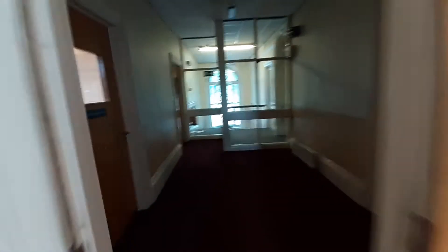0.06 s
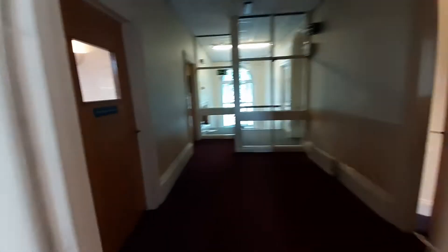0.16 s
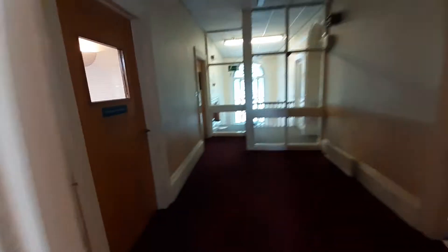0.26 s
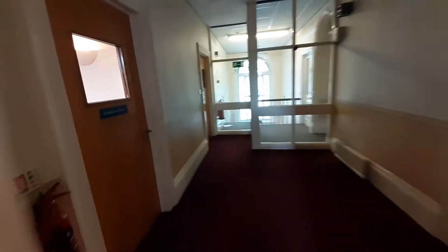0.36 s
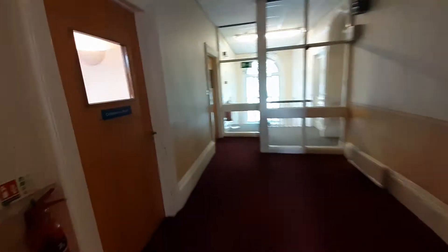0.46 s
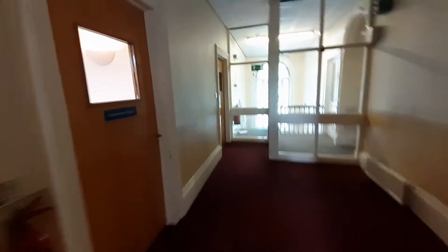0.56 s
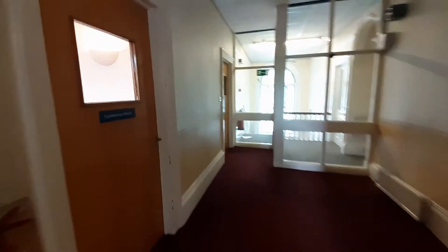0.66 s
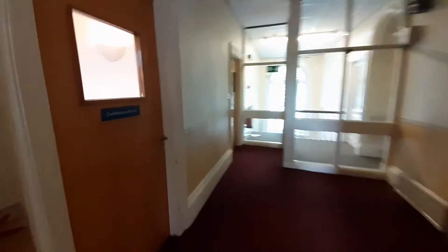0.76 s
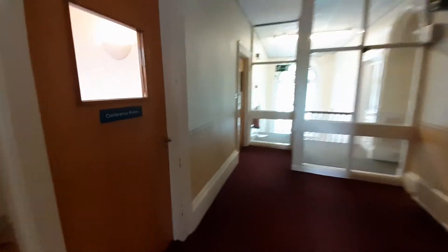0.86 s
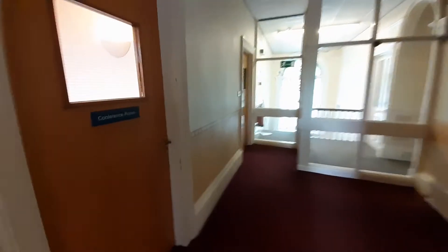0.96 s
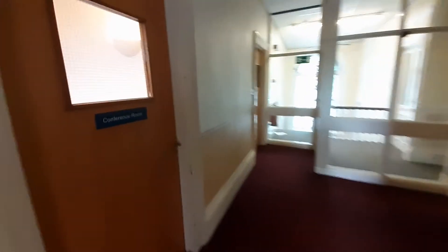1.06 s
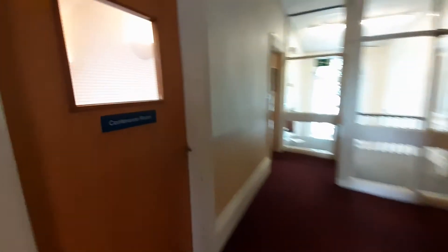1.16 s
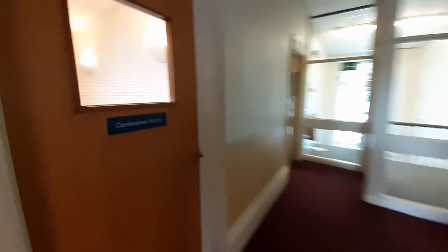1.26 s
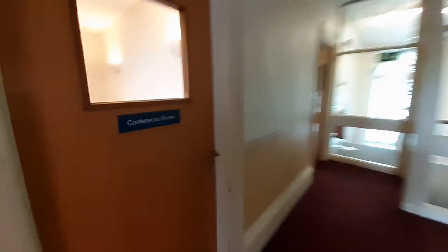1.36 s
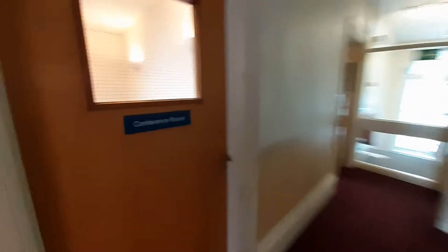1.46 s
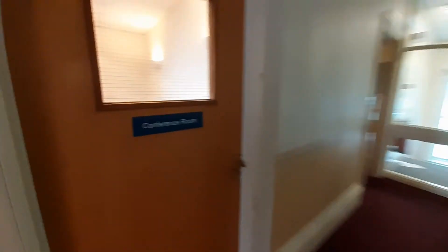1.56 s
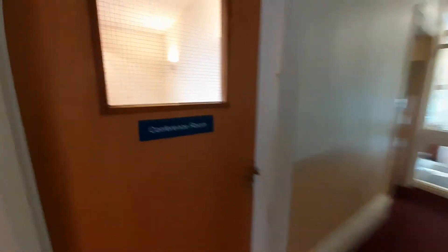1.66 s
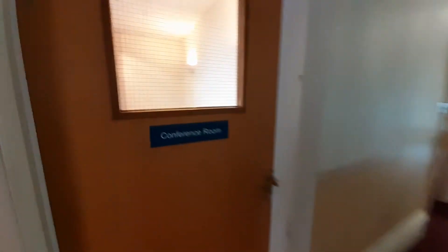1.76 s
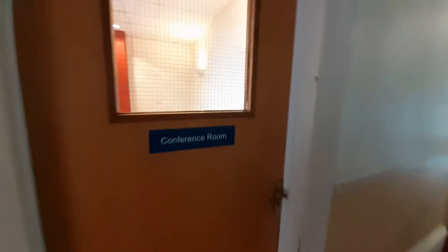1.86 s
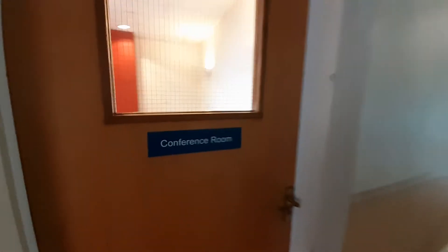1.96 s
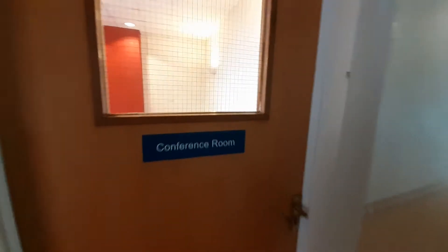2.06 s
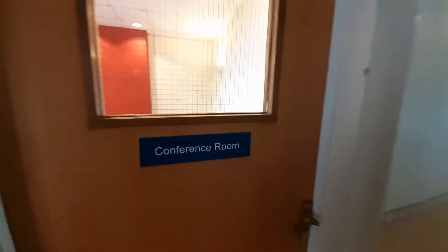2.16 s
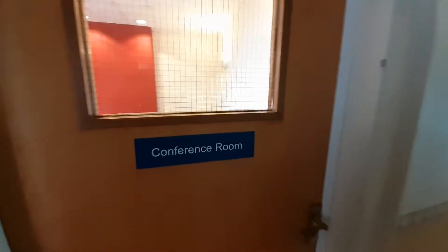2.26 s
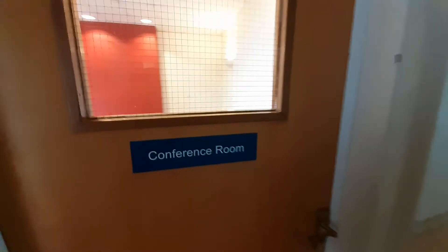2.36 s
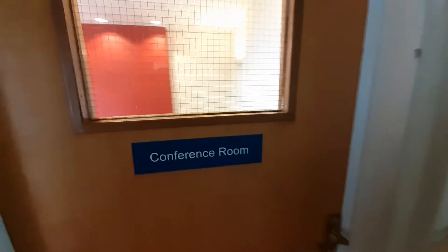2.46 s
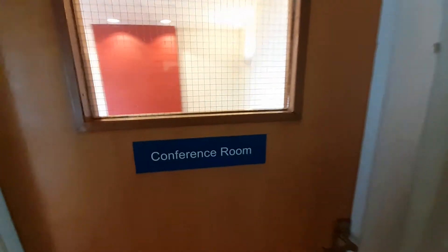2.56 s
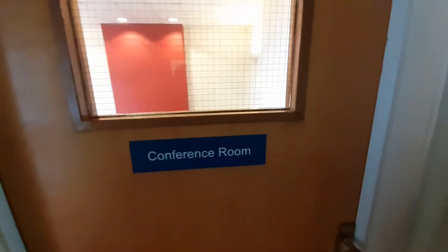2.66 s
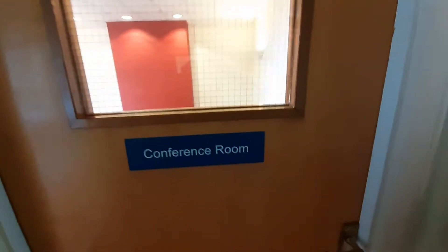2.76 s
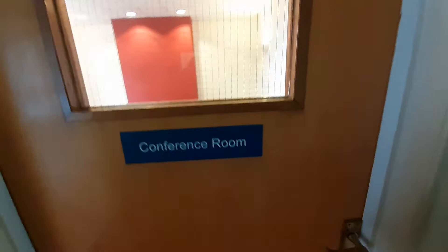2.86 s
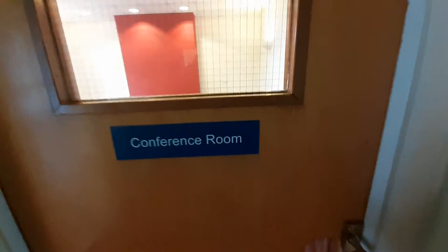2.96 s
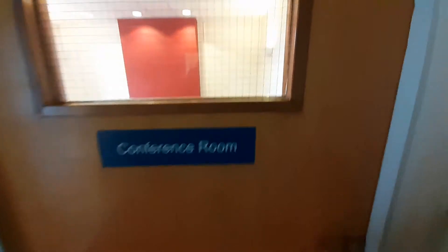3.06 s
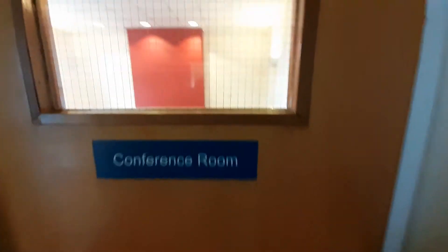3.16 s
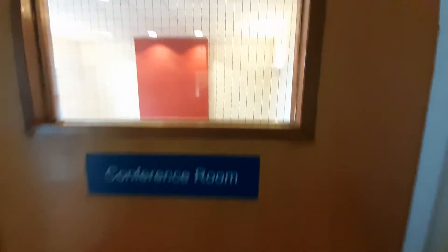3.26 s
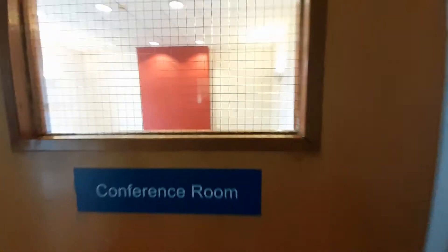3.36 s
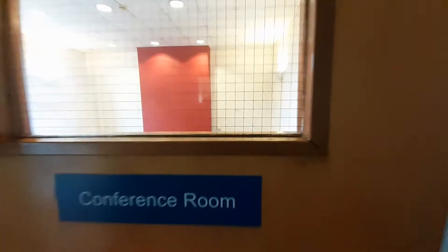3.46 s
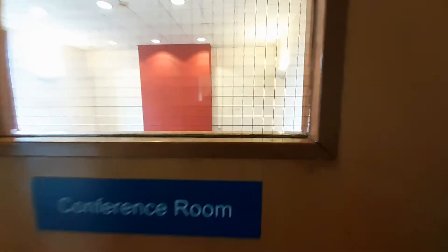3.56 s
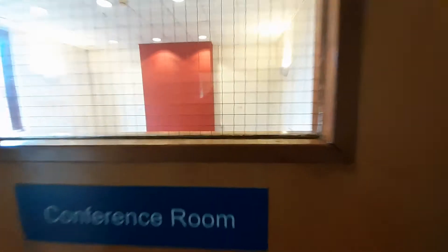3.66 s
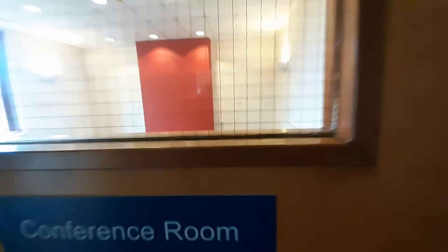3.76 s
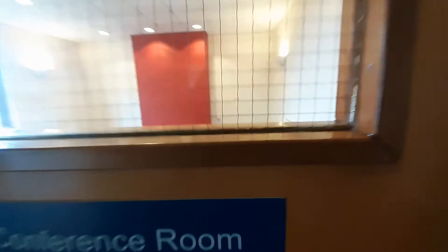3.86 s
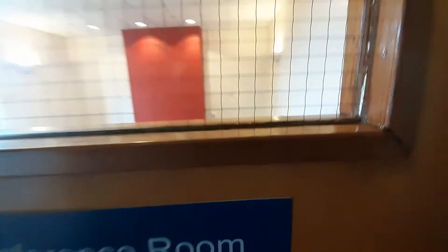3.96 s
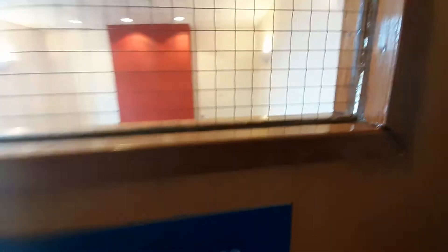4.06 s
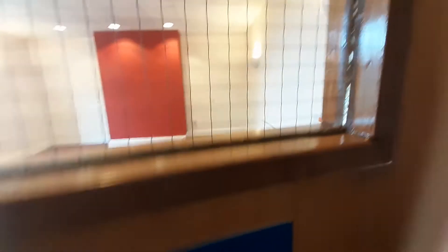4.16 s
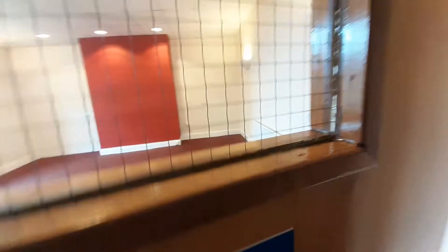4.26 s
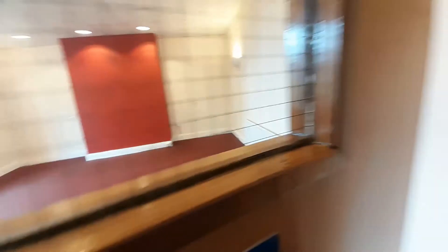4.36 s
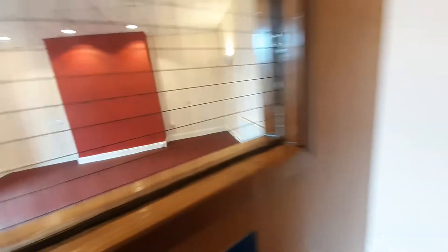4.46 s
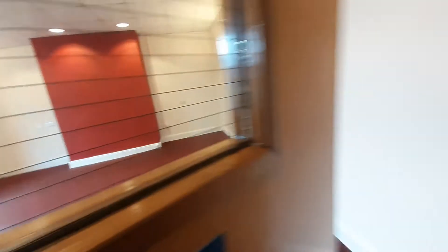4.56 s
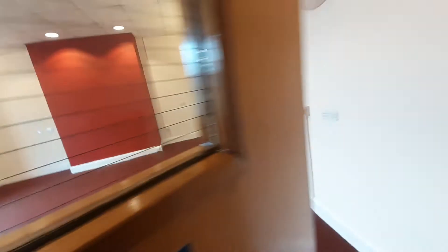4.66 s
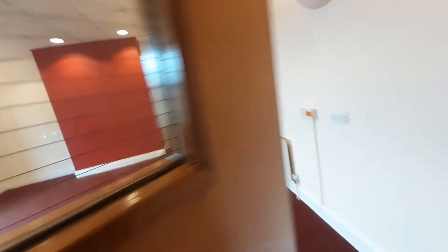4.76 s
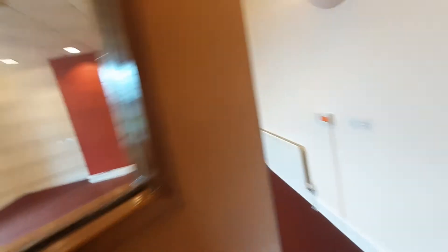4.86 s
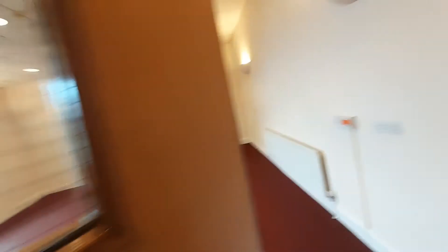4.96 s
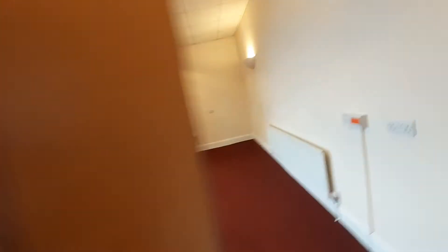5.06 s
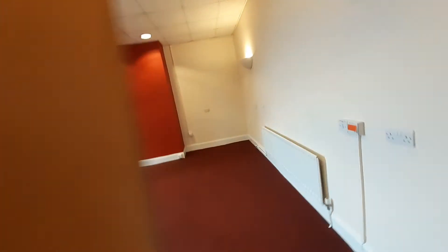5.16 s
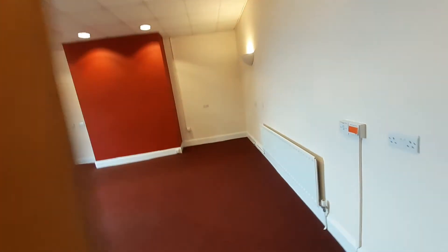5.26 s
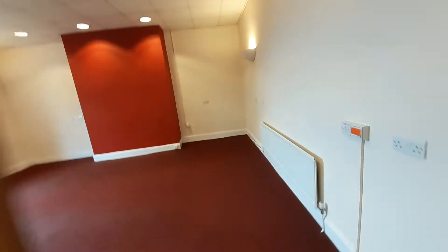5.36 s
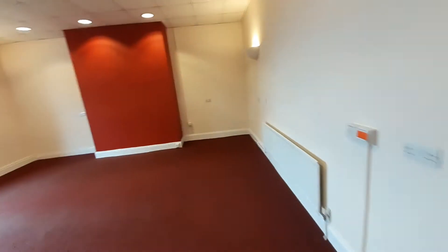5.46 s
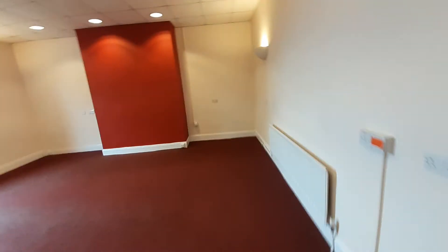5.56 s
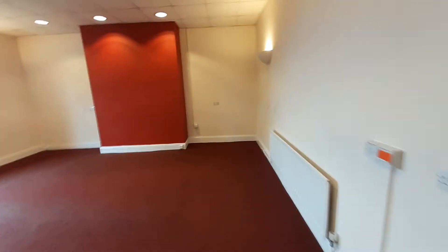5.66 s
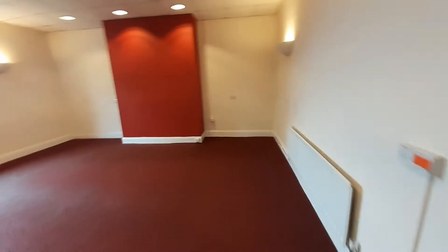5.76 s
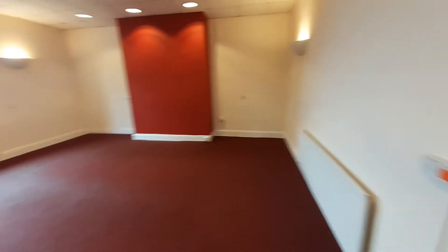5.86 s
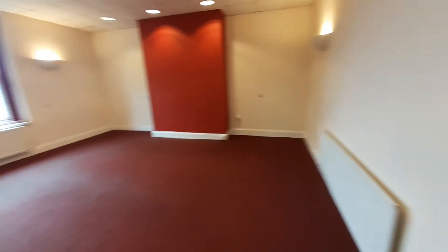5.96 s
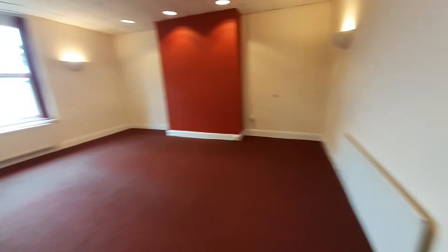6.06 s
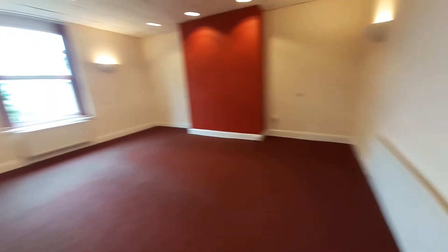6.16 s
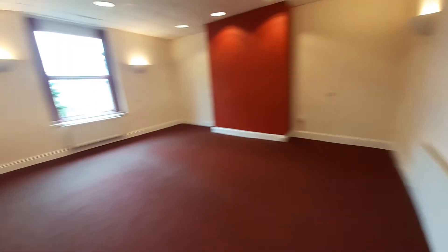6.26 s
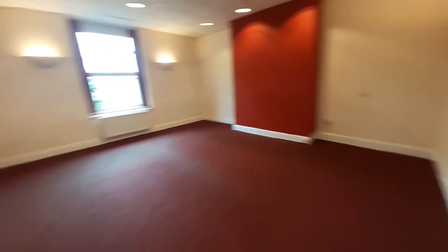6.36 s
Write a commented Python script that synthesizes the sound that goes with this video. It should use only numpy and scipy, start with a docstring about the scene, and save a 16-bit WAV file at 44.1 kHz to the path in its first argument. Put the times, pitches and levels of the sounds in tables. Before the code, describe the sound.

Dull footsteps on carpet and rustling clothing are heard close up on a handheld phone, over the faint hush of an empty building. Midway comes the loudest sound, a cluster of metal handle and latch clicks with the hollow knocks of a wooden door opening. Air rumbles briefly on the microphone in the doorway, followed by an echoing wooden clack and faint steps.

```python
"""Heels thump on carpet in a quiet, bare corridor, as someone walks along with a phone in hand.
Clothes swish with every move, soles brush the carpet, and a zip and buttons tick.
The walker presses a lever handle: the latch clicks and scrapes, and the wooden door booms as it opens.
In the doorway, air buffets the phone's two microphone openings, or "ports".
Wood clacks once near the start, and again in the empty room beyond the door."""
import sys
import numpy as np
from scipy import signal
from scipy.fft import rfft, irfft
from scipy.io import wavfile

SR = 44100
rng = np.random.default_rng(int(sys.argv[2]) if len(sys.argv) > 2 else 0)


def wav_record(signal):
    """Record a signal, one row per channel, as 16-bit PCM in the file named by sys.argv[1]."""
    frames = np.transpose(np.atleast_2d(signal))
    bounded = np.clip(frames, -1, 1)
    # unit amplitude maps onto the largest positive 16-bit level
    quanta = np.round(bounded * 32767).astype(np.int16)
    wavfile.write(sys.argv[1], SR, quanta)


N = 282618
TIME = np.arange(N) / SR
AGE = TIME[:SR]  # one second of ringing

# A "tone" lists how strong each pitch is. A "tilt" above 0 brightens it; one below 0 dulls it.
# echo of the bare walls: f/Hz, time to fade by 60 dB/s
WALL_FADES = [(70, 0.87), (250, 0.76), (1000, 0.39), (3000, 0.47), (12000, 0.23)]
# tone of the building's hush: f/Hz, level/dB
HUSH_TONE = [(18, -49), (30, -25), (145, -14), (540, -32), (600, -24.5), (760, -10), (1810, -16),
             (1960, -5), (2120, -20), (9220, -17), (16000, -15)]
# heels landing on carpet over boards: t/s, level/dB, tilt/(dB per octave), echo/dB
HEEL_HITS = [(0.0224, -23.5, -2, 5), (.062, -26, -5, -13), (0.632, -31.5, -9.5, 7), (1.173, -50.5, -2, 8),
             (1.379, -50, -8, 4), (1.85, -59, 4, 8), (1.9, -53.5, -7, 2.5), (2.478, -45, -22, 0.5),
             (3.233, -48, 7, -14), (6.19, -59.5, -1.5, 13), (6.373, -51, 5, 14)]
# tone of a heel: f/Hz, level/dB
HEEL_TONE = [(35, -26), (70, -5.5), (150, 1.5), (250, -2), (350, -5), (520, -12), (800, -12), (1600, -16),
             (3000, -29.5), (12000, -63)]
# pitches at which the floorboards ring: f/Hz, width/Hz, level/dB
BOARD_RINGS = [(188, 28, -10.5), (270, 15, 6.5), (321, 90, 8)]
# swings of an arm or leg: t/s at the fastest, level/dB, length/s, tilt/(dB per octave)
CLOTH_STROKES = [(.13, -49.5, 0.059, -6), (.37, -46, 0.19, 2), (0.704, -43, .15, 1.5),
                 (0.829, -47.5, 0.11, 1), (1.19, -56.5, 0.036, -2.5), (1.36, -59.5, 0.16, -4),
                 (1.94, -58, .12, -1.5), (2.31, -57, 0.15, -2), (2.7, -41.5, 0.21, 4), (3, -43.5, 0.23, 1),
                 (3.66, -47.5, .24, -4.5), (3.92, -56, 0.22, -3.5), (4.3, -45.5, 0.095, 0),
                 (4.46, -47.5, 0.15, -0.5), (5, -47, 0.19, -1.5), (5.24, -51.5, 0.13, -1.5),
                 (5.58, -59.5, 0.3, -4.5), (5.92, -61.5, 0.11, -8.5), (6.21, -63.5, 0.053, -7.5),
                 (6.4, -61.5, 0.12, -6)]
# tone of cloth rubbing on cloth: f/Hz, level/dB
CLOTH_TONE = [(35, -1), (70, 0), (280, 2), (470, 1), (1200, -1.5), (1900, -2), (3600, -1.5), (5300, -4.5),
              (7700, -3.5), (9100, -12), (12000, -6), (16000, -10)]
# wooden clacks: t/s, level/dB, tilt/(dB per octave), left delay/ms
CLACK_HITS = [(.1828, -32, 0, 0), (5.8485, -31.5, -1.5, -0.61), (5.852, -29.5, 0, -0.41),
              (5.875, -35, 2, -0.27), (5.944, -35, -2.5, -0.4)]
# tone of a hit on wood: f/Hz, level/dB
CLACK_TONE = [(80, -2), (250, -5.5), (480, 8), (800, 4.5), (1300, -3.5), (2200, -9), (4000, -18),
              (8000, -21.5), (15000, -35)]
# pitches at which the clacking wood rings: f/Hz, width/Hz, level/dB
WOOD_RINGS = [(235, 12, 14), (444, 83, -5.5), (1140, 420, 5.5), (1460, 200, -1)]
# ribbed cloth sliding past itself: t/s, level/dB, length/s, f/Hz at which the ribs cross
RIB_SLIDES = [(0.201, -59.5, 0.19, 4700), (.42, -53, 0.15, 4230), (0.613, -50.5, 0.14, 3320),
              (0.843, -44.5, 0.038, 2716), (4.43, -48, 0.14, 2103), (5.015, -54.5, 0.3, 2300)]
# soles brushing the carpet: t/s, level/dB, length/s
SOLE_DRAGS = [(0.266, -45, 0.11), (0.405, -46, 0.14), (0.798, -46.5, 0.23), (1.555, -55.5, 0.039),
              (2.143, -59.5, 0.069), (2.315, -56, 0.016), (2.704, -46.5, 0.26), (5.712, -54.5, 0.14),
              (5.857, -50, 0.017), (6.213, -52, 0.043)]
# tone of a brushing sole: f/Hz, level/dB
SOLE_TONE = [(60, -49), (300, -5), (600, 3), (850, 4.5), (1300, 2.5), (1800, -6), (4000, -7.5),
             (16000, -62)]
# zip and buttons ticking: t/s, level/dB, tilt/(dB per octave), left delay/ms
ZIP_HITS = [(.787, -51, -1, 0), (.895, -44.5, 2.5, 0), (1.175, -53, 18, 0), (1.665, -63, 8, 0),
            (5.245, -45.5, 1, -.2), (5.335, -47.5, 0.5, -.2), (5.4705, -47, 5.5, -.2),
            (6.3635, -46.5, 3, -.3)]
# tone of small metal parts: f/Hz, level/dB
METAL_TONE = [(70, -34), (200, -27), (600, -8), (1300, -2), (1650, -3), (1950, 4.5), (2400, 0.5),
              (2900, -2.5), (4200, 0), (5500, -6.5), (7800, -3.5), (9500, -15.5), (12000, -10),
              (16000, -16)]
# clicks of the handle and latch: t/s, level/dB, tilt/(dB per octave), left delay/ms
LATCH_HITS = [(3.2555, -38.5, -6.5, 0.11), (3.2585, -57, -6, 0), (3.326, -38, -6.5, -0.73),
              (3.348, -35, -7.5, 0.49), (3.356, -34.5, -6, -0.03), (3.3672, -32.5, 2, 0.17),
              (3.373, -32, 1, 0.21), (3.5115, -26.5, -1, 0.16), (3.5195, -32.5, -2.5, 0.83),
              (3.539, -38, -5, -0.44), (3.56, -31, -2.5, 0.61), (3.5665, -25, 5, -0.2),
              (3.577, -32, -4.5, 0), (3.5995, -29, -4.5, 0.025), (3.6265, -24.5, -10, 0.031),
              (3.638, -26, -7, 0), (3.6435, -15, -6, 1), (3.6458, -24.5, -11.5, -0.34),
              (3.7567, -22.5, -0.5, 0.22), (3.8387, -26.5, 9, -0.12), (3.8535, -28.5, 3, 0.35),
              (3.8735, -26, 7.5, 0.3), (3.8862, -28.5, 3.5, 0.47), (3.9137, -34.5, 2, 0.65),
              (3.932, -37, -10, 0.21)]
# the handle turning and the latch sliding: t/s at the start, length/s, level/dB
HANDLE_RUBS = [(3.349, 0.022, -41), (3.498, 0.13, -41.5), (3.78, 0.085, -38), (3.859, 0.083, -33.5)]
# blows on the door: t/s, level/dB, f/Hz above which the blow is muffled
DOOR_HITS = [(3.354, -31, 1190), (3.3649, -26, 1480), (3.3723, -19.5, 915), (3.425, -30, 700),
             (3.388, -33.5, 110), (3.502, -37, 700), (3.567, -25.5, 1320), (3.579, -26.5, 600),
             (3.5982, -28.5, 1300), (3.6276, -29, 2020), (3.643, -28, 2480), (3.651, -17.5, 440),
             (3.662, -15.5, 134), (3.756, -33, 1290), (3.861, -31, 270)]
# pitches at which the door rings: f/Hz, level/dB, time to fade by 60 dB with no hand on it/s
DOOR_RINGS = [(72.4, -4.5, 0.34), (93, -8.5, 0.16), (126.4, -10.5, 0.35), (167.8, -8.5, 0.244),
              (252.7, 2, 0.18), (292, -11, 0.27), (393.6, -3.5, 0.16), (436, -10, 0.058), (473, 0.5, 0.3),
              (497.6, -6, 0.32), (641, -3.5, 0.3), (660, -4, 0.2), (804, 10, 0.056), (955, 2, 0.22),
              (1017, 1, 0.23), (1100, 1.5, 0.092), (1296, -1, 0.095), (1560, -5, 0.17), (1576, 3, 0.034),
              (1760, 6.5, 0.13), (1920, 2, 0.047), (2180, -10, 0.083), (2270, 2, 0.13)]
# gusts on the ports: t/s, level/dB, length/s, top f/Hz, left minus right/dB
AIR_GUSTS = [(4.476, -30.5, 0.033, 141, -14), (4.533, -25, 0.021, 218, -21), (4.63, -20.5, 0.038, 243, -27),
             (4.68, -20, 0.026, 563, -36), (4.706, -22.5, .022, 273, -37), (4.847, -33.5, 0.17, 150, 2.5),
             (4.933, -28.5, .05, 142, 25), (4.994, -19, 0.027, 152, 34), (5.058, -25.5, 0.071, 230, -14),
             (5.123, -18.5, 0.017, 276, -3), (5.184, -18, 0.017, 205, -14), (5.299, -33, 0.17, 130, 12),
             (5.452, -28.5, 0.015, 120, 29), (5.625, -40, 0.092, 144, 8)]


def amp(db):
    """Turn decibels into a number to multiply by."""
    return 10 ** (np.asarray(db) / 20)


def along(points, hz):
    """Read between (Hz, value) points, giving each octave equal space."""
    point_hz, value = np.transpose(points)
    return np.interp(np.log(hz + 1), np.log(point_hz), value)


def unit(x):
    """Scale to an average energy of 1 per channel."""
    return x / np.sqrt(np.mean(np.sum(x ** 2, axis=-1)))


def add(out, s, x, db):
    """Mix in a sound at s seconds; its level is its energy spread over 10 ms."""
    start = max(int(s * SR), 0)
    out[:, start:start + x.shape[-1]] += amp(db) * np.sqrt(SR / 100) * x[..., :N - start]


def pan(x, db):
    """Make the left channel db louder than the right."""
    return np.array([x[0] * amp(db / 2), x[1] * amp(-db / 2)])


def swell(t, length_s, shape=2):
    """A smooth rise and fall around t = 0; a higher shape gives a flatter top."""
    return np.exp(-2 * np.abs(t / length_s) ** shape)


def fade(fade_s):
    """Die away by 60 dB every fade_s seconds."""
    return amp(-60 * AGE / fade_s)


def muffle(x, hz, order=2):
    """Weaken everything above hz."""
    return signal.sosfilt(signal.butter(order, hz, fs=SR, output="sos"), x)


def jitter(hold):
    """Random values that jump every `hold` samples."""
    return np.repeat(rng.standard_normal(N // hold + 1), hold)[:N]


def diffuse(size, alike_hz=700):
    """Noise from all sides: long waves reach both ports alike."""
    shared, apart = rfft(rng.standard_normal((2, size)))
    alike = .9 / (1 + (np.fft.rfftfreq(size, 1 / SR) / alike_hz) ** 4)
    shared, apart = shared * np.sqrt(1 + alike), apart * np.sqrt(1 - alike)
    return irfft(np.array([shared + apart, shared - apart]), size) / np.sqrt(2)


def colour(x, tone):
    """Give a steady noise a tone, at a typical size (rms) of 1."""
    shaped = irfft(rfft(x) * amp(along(tone, np.fft.rfftfreq(N, 1 / SR))), N)
    return shaped / shaped.std()


def pulse(tone, tilt_db, size=2048):
    """The sharpest click that has this tone, tilted around 1 kHz."""
    hz = np.fft.rfftfreq(size, 1 / SR)
    octaves = np.log2(np.maximum(hz, 70) / 1000)
    cepstrum = irfft(np.log(amp(along(tone, hz) + tilt_db * octaves)))
    # folding the second half onto the first packs the energy at the click's start
    cepstrum[1:size // 2] *= 2
    cepstrum[size // 2 + 1:] = 0
    return unit(irfft(np.exp(rfft(cepstrum))))


def resonate(x, rings):
    """Add ringing at a few pitches to a sound."""
    return x + sum(amp(db) * signal.lfilter(*signal.iirpeak(hz, hz / width_hz, fs=SR), x)
                   for hz, width_hz, db in rings)


def echo(x, build_s=0.0036):
    """Reflections off the walls build up, then die away, the treble first."""
    noise, hz = rfft(diffuse(SR)), np.fft.rfftfreq(SR, 1 / SR)
    band_hz, fades_s = np.transpose(WALL_FADES)
    tail = sum(irfft(noise * along(np.c_[band_hz, band], hz), SR) * fade(fade_s)
               for band, fade_s in zip(np.eye(len(band_hz)), fades_s))
    tail *= 1 - np.exp(-AGE / build_s)
    tail *= np.sqrt(2 * np.log(1000) / SR / fades_s[1])  # near 250 Hz, about as strong as the source
    return signal.fftconvolve(x, tail, axes=-1)[:, :x.shape[-1]]


def strike(tone, tilt_db, lag_ms, ring_s, ring_db, crack_s=0.0071, crack_db=3):
    """One hit: a click at each port, then a brief crack and a duller ring of many pitches."""
    crack = unit(diffuse(SR) * fade(crack_s) * np.sqrt(AGE))
    ring = unit(diffuse(SR) * fade(ring_s))
    push = amp(crack_db) * crack + amp(ring_db) * muffle(ring, hz=5000, order=1)
    lag = int(round(lag_ms * SR / 1000))
    push[0, max(lag, 0)] += 1
    push[1, max(-lag, 0)] += 1
    return unit(signal.fftconvolve(push, pulse(tone, tilt_db)[None], axes=-1)[:, :SR])


def strikes(hits, tone, ring_s, ring_db, echo_db, pan_db, spot_db=0.3):
    """Hits of one kind with their echo; each meets a new spot, which changes its tone a little."""
    out = np.zeros((2, N))
    hz, tone_db = np.transpose(tone)
    for s, db, tilt_db, lag_ms in hits:
        spot_tone = np.c_[hz, tone_db + spot_db * rng.standard_normal(len(hz))]
        add(out, s, strike(spot_tone, tilt_db, lag_ms, ring_s, ring_db), db)
    return pan(out + amp(echo_db) * echo(out), pan_db)


def hush(level_db=-65.5):
    """The building's faint, steady noise comes from all sides."""
    return pan(colour(diffuse(N), HUSH_TONE), db=3.9) * amp(level_db)


def footsteps():
    """Each heel gives a dull thump on the boards that fills the corridor from a new spot."""
    out = np.zeros((2, N))
    for s, db, tilt_db, echo_db in HEEL_HITS:
        heel = strike(HEEL_TONE, tilt_db, lag_ms=0, ring_s=0.045, ring_db=-4, crack_db=-39.5)
        thump = unit(resonate(heel, BOARD_RINGS))
        add(out, s, thump + amp(echo_db) * unit(echo(thump)), db)
    return pan(out, db=3.5)


def cloth_motion(rest_db=-71.5, rest_tilt_db=-6, tilt_per_db=0.2421):
    """Level and tilt of sliding cloth: strokes add up, and each is brightest at its fastest."""
    power = np.full(N, amp(rest_db) ** 2)
    tilt = power * rest_tilt_db
    for s, db, length_s, tilt_db in CLOTH_STROKES:
        t = (TIME - s) / np.where(TIME > s, 1.14, 1)  # slowing down takes longer than speeding up
        speed = swell(t, length_s, shape=1.7) + 1e-12
        stroke = amp(db) ** 2 * speed
        power += stroke
        tilt += stroke * (tilt_db + tilt_per_db * 10 * np.log10(speed))
    return 10 * np.log10(power), tilt / power


def cloth_swish(boost_db=3, rough_db=1, flutter_db=1.3, split_hz=2000):
    """Countless fibres catch and let go; the hiss swells with the swing of arms and legs."""
    db, tilt_db = cloth_motion()
    catches = rough_db * jitter(hold=48)
    folds = flutter_db * np.interp(TIME, np.linspace(0, TIME[-1], 200), rng.standard_normal(200))
    hiss = colour(diffuse(N) * amp(catches + folds), CLOTH_TONE)
    # the soft rub of the folds lies about two octaves under the hiss, so it gets twice the tilt
    rub = signal.sosfiltfilt(signal.butter(1, split_hz, fs=SR, output="sos"), hiss)
    return (hiss - rub + rub * amp(-2 * tilt_db)) * amp(db + boost_db)


def wood_clacks():
    """Short, hard hits make wood ring, with a strong echo."""
    hits = strikes(CLACK_HITS, CLACK_TONE, ring_s=0.008, ring_db=-7, echo_db=2.5, pan_db=4)
    return amp(-2.5) * resonate(hits, WOOD_RINGS)


def cloth_ribs(spread_hz=570):
    """Ribs of the weave cross each other, making a band of noise around their crossing rate."""
    noise = muffle(rng.standard_normal((2, N)) + 1j * rng.standard_normal((2, N)), spread_hz)
    crossings = sum(amp(db) * swell(TIME - s, length_s) * np.exp(2j * np.pi * hz * TIME)
                    for s, db, length_s, hz in RIB_SLIDES)
    return np.real(noise * crossings) / noise.real.std()  # multiplying moves the noise up in pitch


def sole_scuffs(echo_db=-5):
    """A sole drags briefly over the carpet as the foot rolls or swings."""
    pressure = sum(amp(db) * swell(TIME - s, length_s) for s, db, length_s in SOLE_DRAGS)
    brush = colour(diffuse(N), SOLE_TONE) * pressure
    return pan(brush + amp(echo_db) * echo(brush), db=2.3)


def zip_ticks():
    """The zip and buttons tap lightly and ring for a moment."""
    return strikes(ZIP_HITS, METAL_TONE, ring_s=0.058, ring_db=19, echo_db=3, pan_db=5)


def latch_clicks():
    """Metal hits metal inside the handle and latch."""
    return strikes(LATCH_HITS, METAL_TONE, ring_s=0.061, ring_db=8, echo_db=-6, pan_db=0.8)


def handle_scrape(rough_db=4, brighten=0.37, rise_s=0.0081, fall_s=0.0062, echo_db=-9):
    """The handle's shaft and spring rub in a dense run of tiny slips."""
    slips = amp(rough_db * jitter(hold=64))
    grit = signal.lfilter([1, -brighten], 1, diffuse(N) * slips)
    force = np.zeros(N)
    for s, length_s, db in HANDLE_RUBS:
        rise = np.clip((TIME - s) / rise_s, 0, 1)
        fall = np.exp(-np.maximum(TIME - s - length_s, 0) / fall_s)
        force += amp(db) * rise * fall
    rub = colour(grit, METAL_TONE) * force
    return rub + amp(echo_db) * echo(rub)


def door_boom(crack_db=-8, echo_db=-8, build_cycles=0.37, hand_db_per_s=60, lag_ms=0.3):
    """Blows make the door ring; a softer contact wakes only its lowest pitches."""
    out = np.zeros((2, N))
    hz, ring_db, fade_s = np.transpose(DOOR_RINGS)[:, :, None]
    held = amp(-hand_db_per_s * AGE)  # the hand on the lever damps the door
    # low bending waves travel more slowly, so the boom arrives after the crack
    build = 1 - np.exp(-AGE * hz / build_cycles)
    swing = held * amp(ring_db) * fade(fade_s) * build
    delay_s = np.array([lag_ms / 1000, 0])[:, None, None]  # the left port hears the door later
    for s, db, contact_hz in DOOR_HITS:
        # the door's short waves reach the two ports out of step
        phase = 0.26 * rng.standard_normal((2, len(hz), 1)) * np.minimum(hz / 500, 2)
        phase += np.pi * rng.integers(0, 2, hz.shape)
        # changing pressure on the latch shifts the pitches from blow to blow
        shifted_hz = hz * (1 + .015 * rng.standard_normal(hz.shape))
        ring = (swing * np.sin(2 * np.pi * shifted_hz * (AGE - delay_s) + phase)).sum(axis=1)
        crack = strike(CLACK_TONE, tilt_db=0.17, lag_ms=lag_ms, ring_s=0.11, ring_db=1.5)
        blow = unit(ring) + amp(crack_db) * crack
        add(out, s, unit(muffle(blow, contact_hz)), db)
    return pan(out + amp(echo_db) * echo(out), db=2.4)


def door_shade(x, pan_db=2.8, shade_db=2, at_s=4.34, length_s=0.44):
    """The opening door passes close to the left port, so a sound briefly leans less to the left."""
    return pan(x, pan_db - shade_db * swell(TIME - at_s, length_s))


def air_gusts(lowest_hz=46, swirls_per_s=60, swirl_db=4.5):
    """Each gust breaks into swirls of air; most press harder on one port."""
    out = np.zeros((2, N))
    t = AGE[:SR // 2] - 1 / 4  # half a second, centred on the gust
    for s, db, length_s, top_hz, pan_db in AIR_GUSTS:
        swirls = np.interp((t - t[0]) * swirls_per_s, np.arange(64), rng.standard_normal(64))
        push = rng.standard_normal((2, len(t))) * amp(swirl_db * swirls) * swell(t, length_s)
        band = signal.butter(2, (lowest_hz, top_hz), "band", fs=SR, output="sos")
        rumble = signal.sosfiltfilt(band, push)
        ports = pan(np.array([unit(port) for port in rumble]), pan_db)
        add(out, s + t[0], unit(ports) * np.sqrt(length_s * 50), db)  # longer gusts carry more energy
    return out


def scene():
    """Steps, clothes, wood, door and moving air over the hush of the building."""
    walking = footsteps() + sole_scuffs()
    clothes = door_shade(cloth_swish() + cloth_ribs()) + zip_ticks()
    door = latch_clicks() + handle_scrape() + door_boom()
    return hush() + walking + clothes + wood_clacks() + door + air_gusts()


def record(dry, bass_hz=42, ceiling=.75, top_hz=15900):
    """The phone drops the deepest bass, rounds the loudest peaks and cuts the highest treble."""
    thin = signal.sosfilt(signal.butter(2, bass_hz, "high", fs=SR, output="sos"), dry)
    rounded = ceiling * np.tanh(thin / ceiling)
    return signal.sosfilt(signal.ellip(10, .2, 80, top_hz, fs=SR, output="sos"), rounded)


dry = scene()
out = record(dry)
wav_record(out)
```